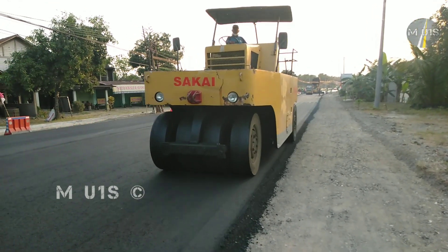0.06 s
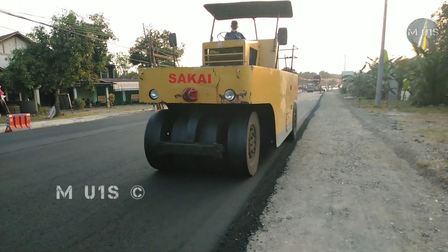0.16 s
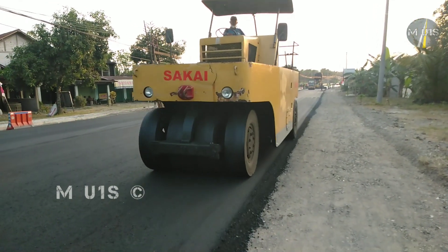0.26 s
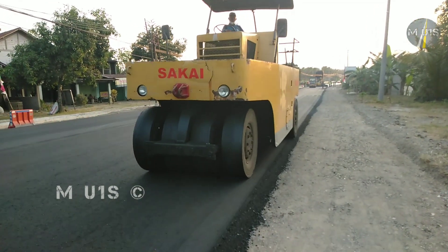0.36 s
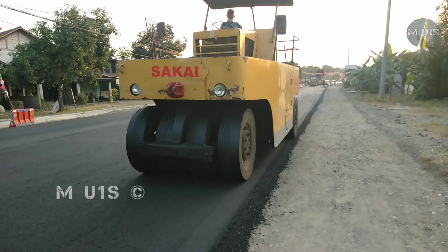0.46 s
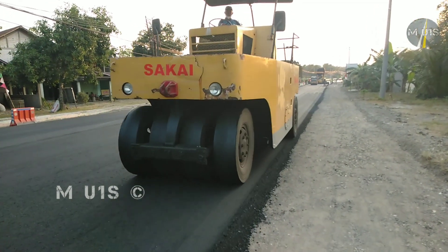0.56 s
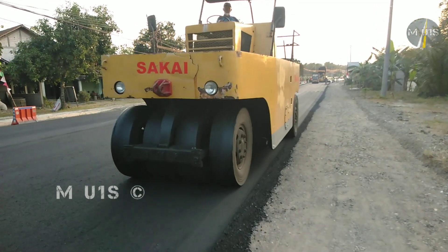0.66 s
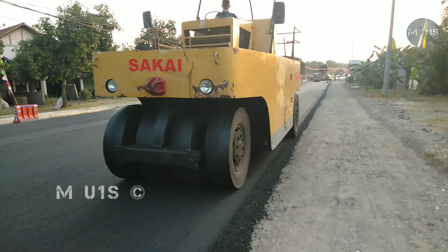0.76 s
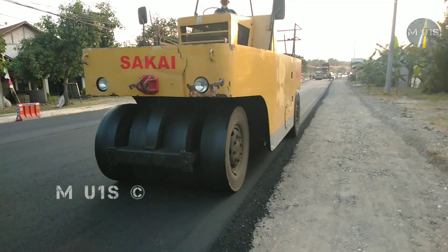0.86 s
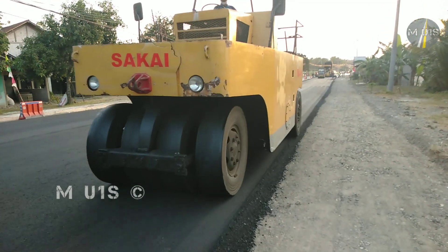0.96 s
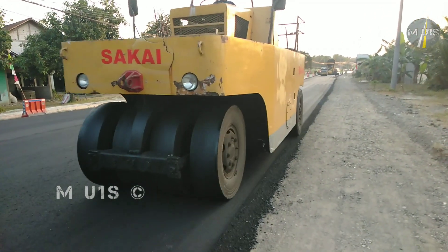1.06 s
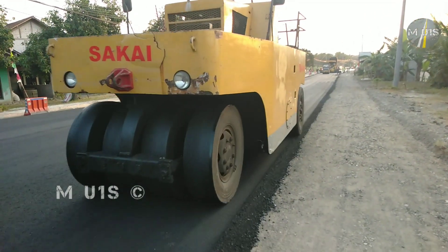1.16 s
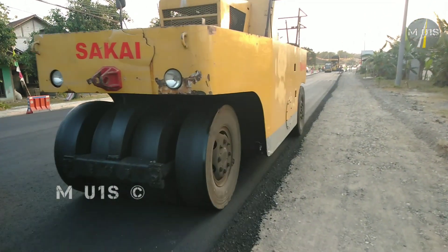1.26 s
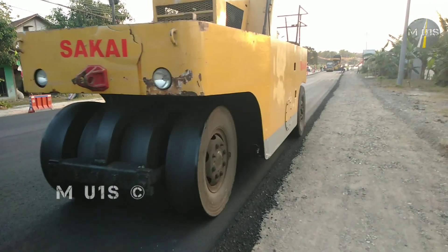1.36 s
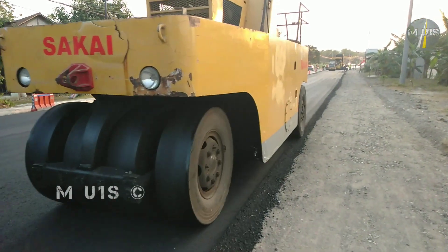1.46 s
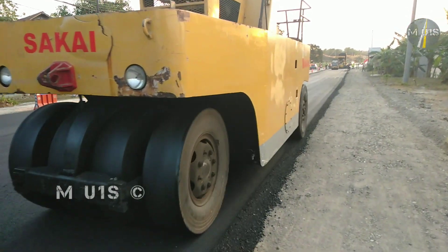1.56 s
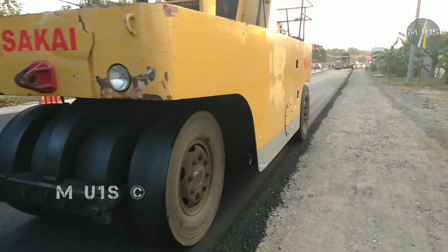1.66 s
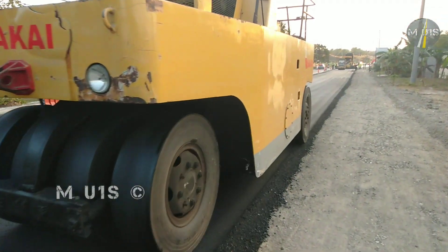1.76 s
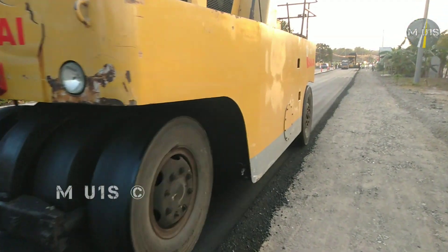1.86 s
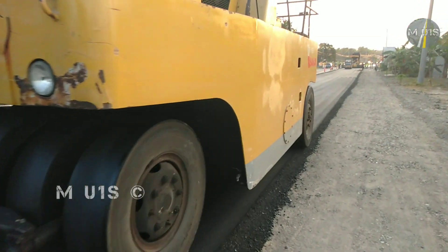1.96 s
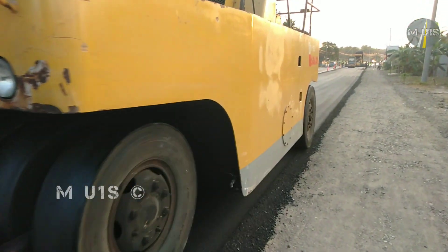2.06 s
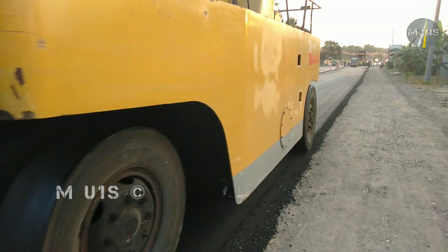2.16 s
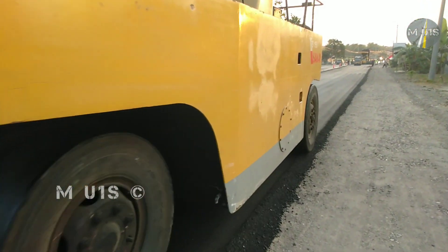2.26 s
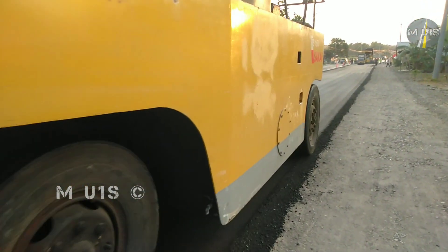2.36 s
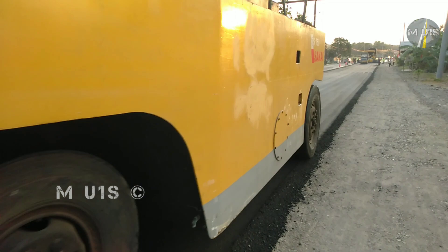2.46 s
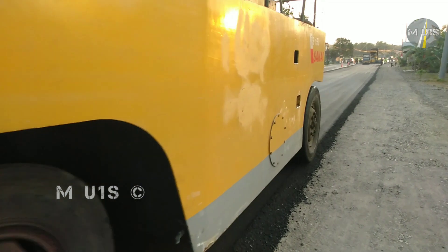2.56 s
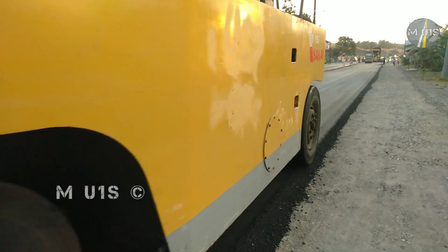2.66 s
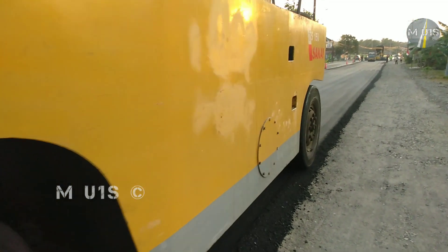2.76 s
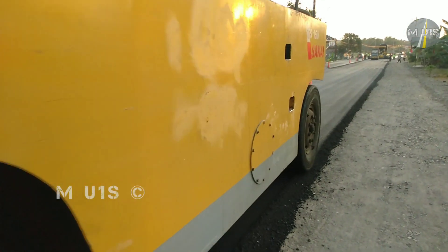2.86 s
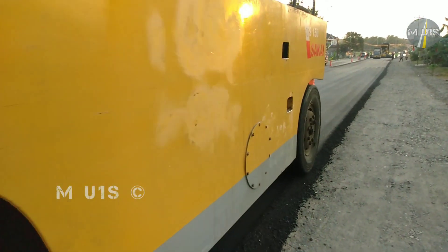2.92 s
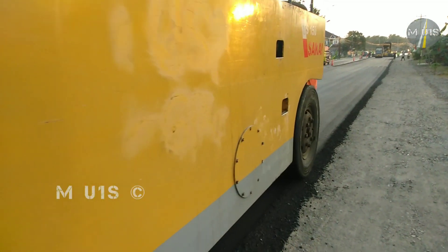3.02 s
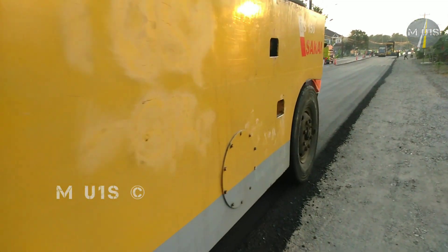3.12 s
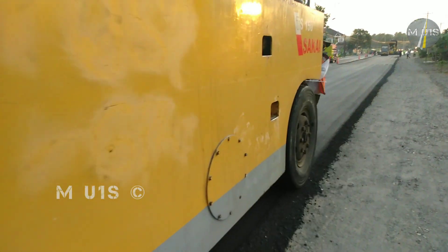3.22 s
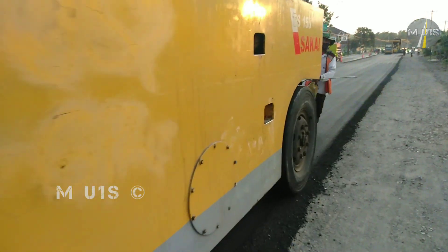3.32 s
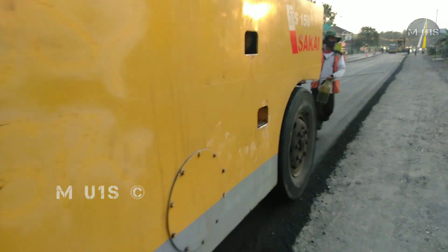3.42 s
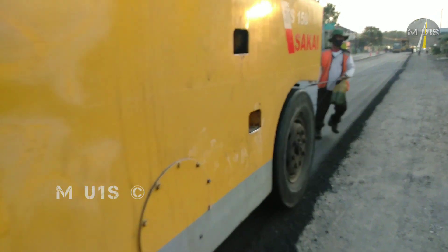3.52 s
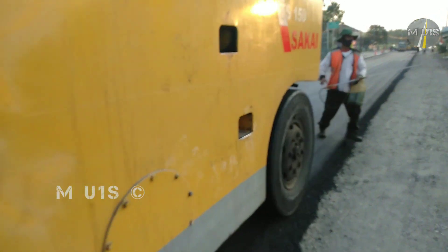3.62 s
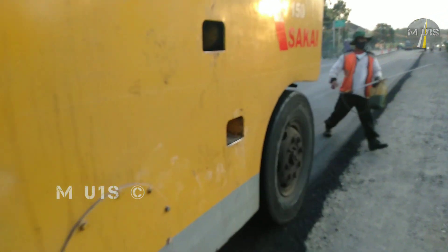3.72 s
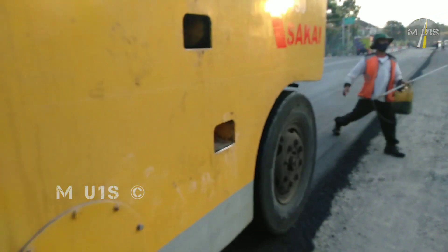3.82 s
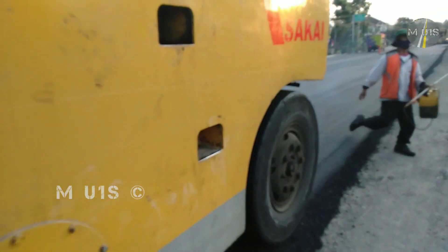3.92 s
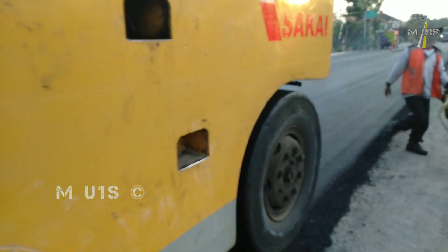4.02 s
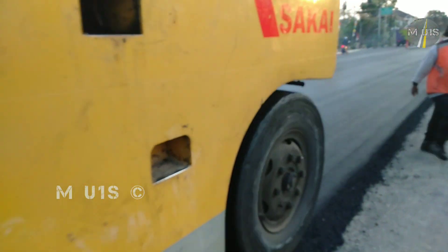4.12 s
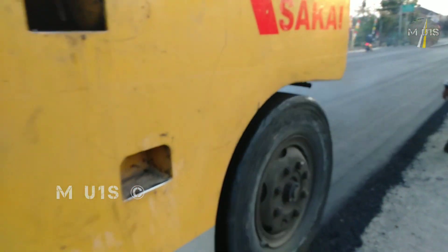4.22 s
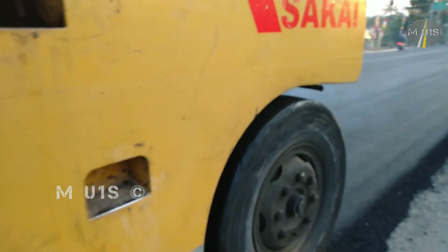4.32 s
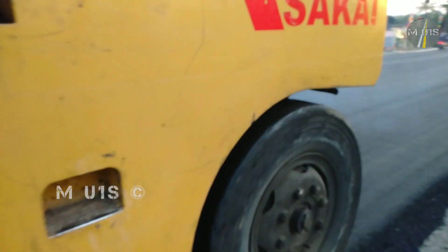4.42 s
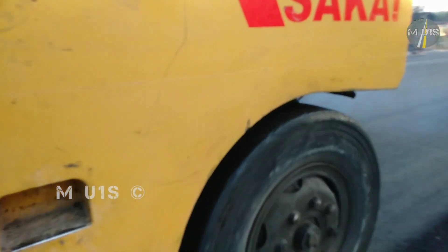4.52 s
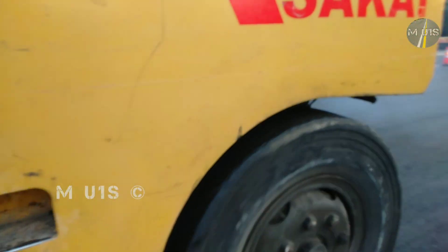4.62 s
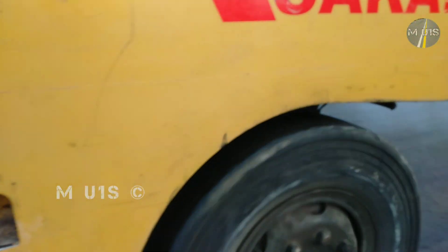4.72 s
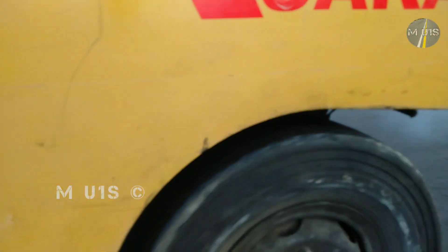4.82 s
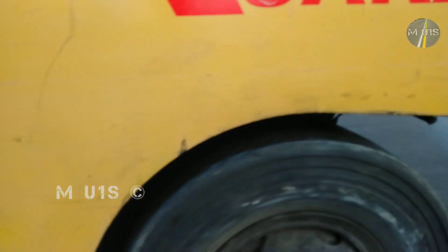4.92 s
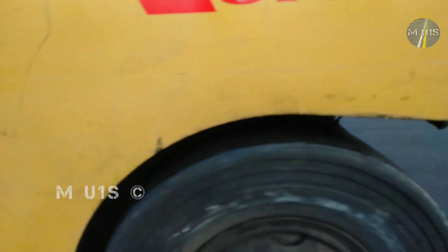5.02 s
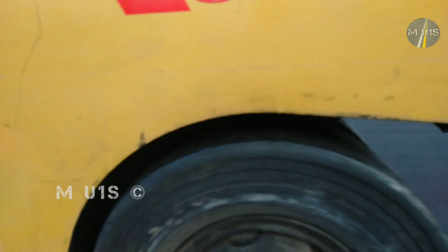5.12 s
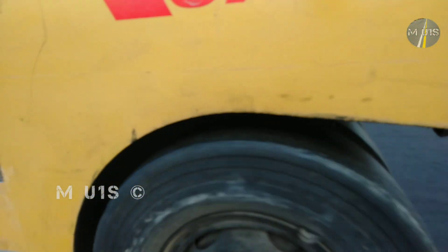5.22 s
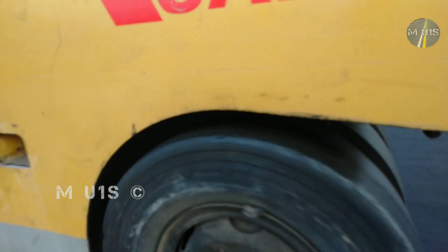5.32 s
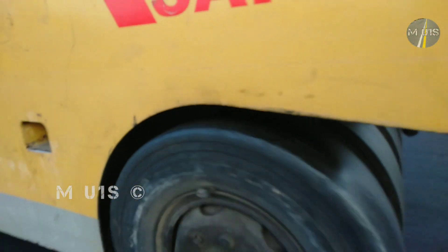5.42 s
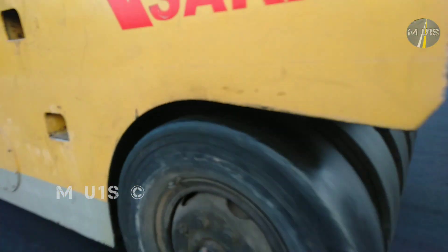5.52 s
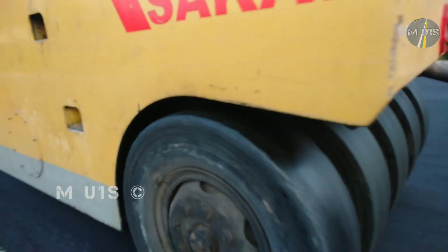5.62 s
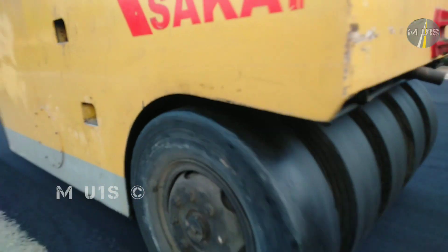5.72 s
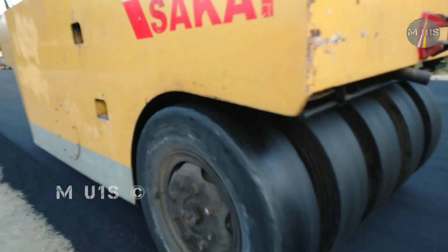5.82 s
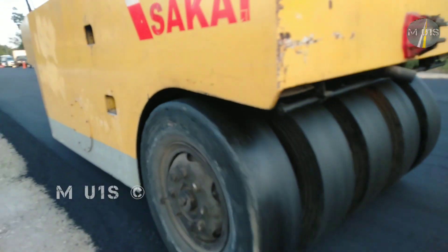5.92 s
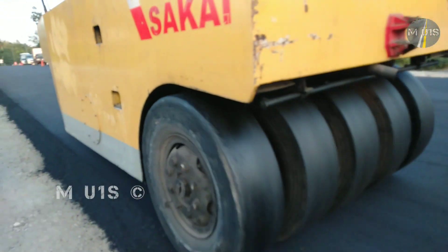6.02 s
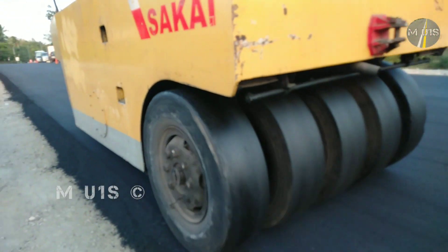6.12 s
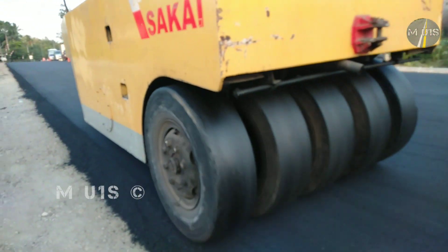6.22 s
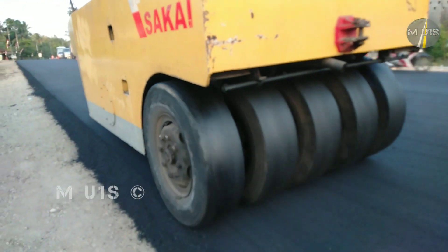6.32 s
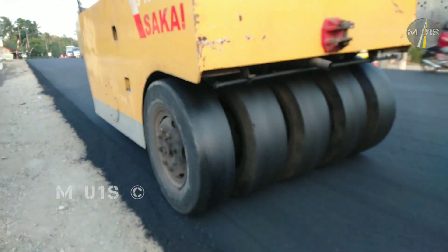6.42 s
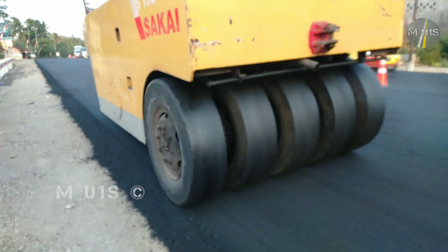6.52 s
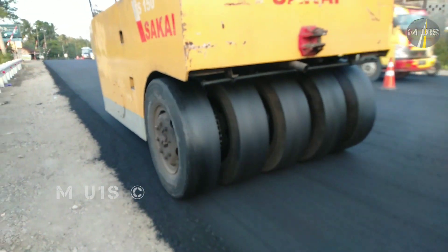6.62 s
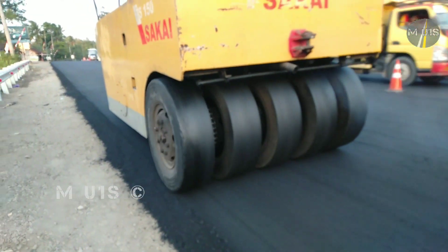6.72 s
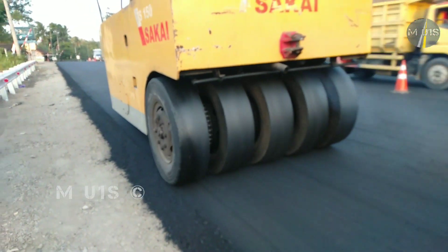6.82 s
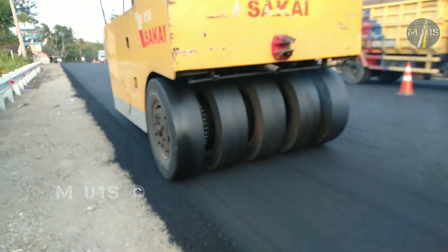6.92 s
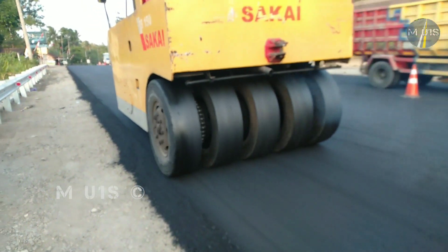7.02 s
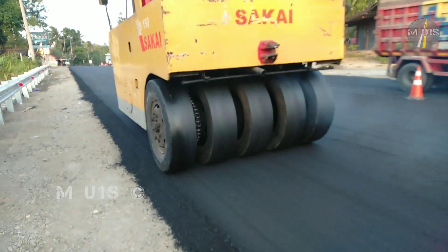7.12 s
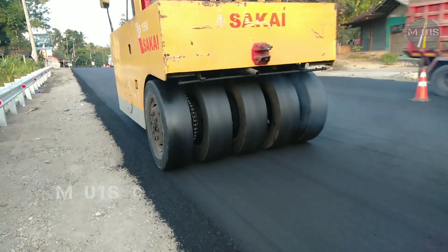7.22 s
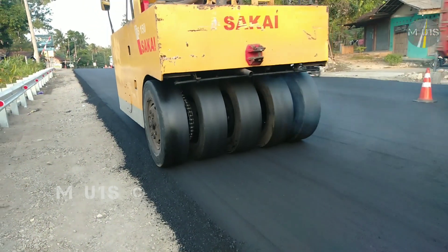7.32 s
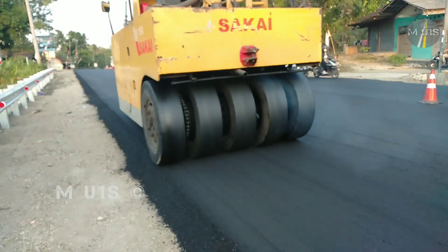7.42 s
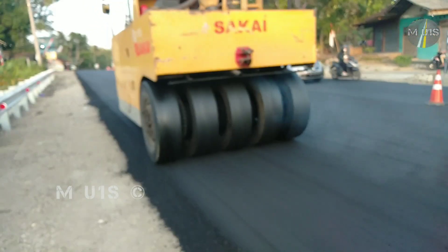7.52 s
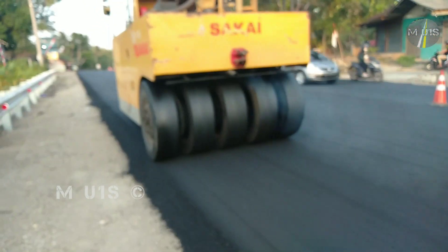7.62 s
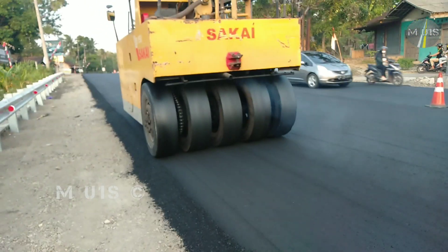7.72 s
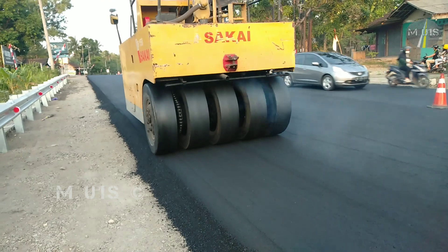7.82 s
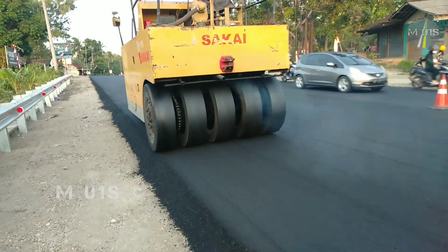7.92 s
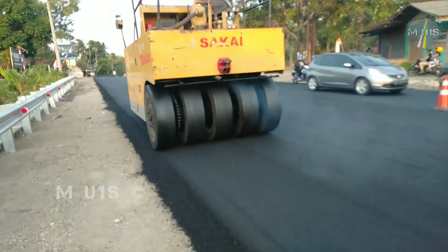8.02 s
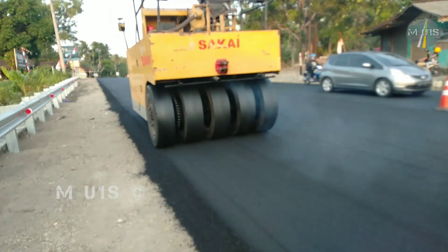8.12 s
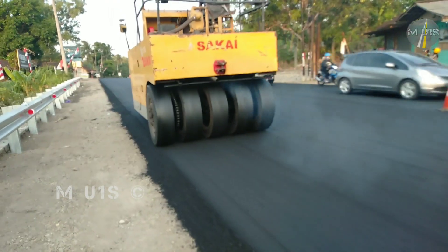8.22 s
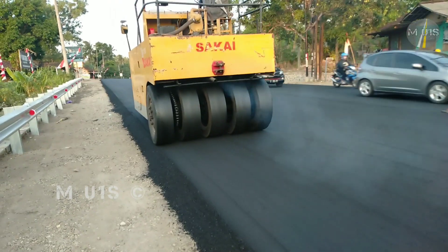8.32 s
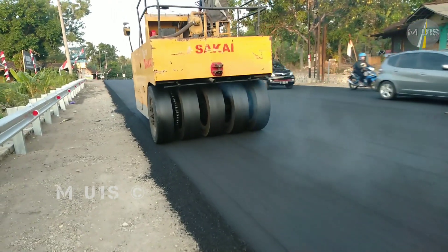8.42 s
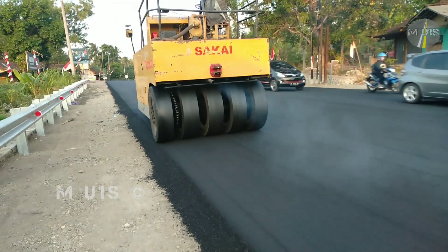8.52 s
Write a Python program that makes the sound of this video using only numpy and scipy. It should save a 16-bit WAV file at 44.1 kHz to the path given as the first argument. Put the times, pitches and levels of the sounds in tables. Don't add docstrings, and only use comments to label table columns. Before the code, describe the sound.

Close pass of a heavy diesel roller: steady throaty drone, fan roar, rattling valves, wavering pump whine, a short air hiss and tiny rubber squeaks.

```python
import sys
import numpy as np
from scipy import signal
from scipy.fft import next_fast_len
from scipy.io import wavfile

SR = 44100
rng = np.random.default_rng(int(sys.argv[2]) if len(sys.argv) > 2 else 0)


def master_out(mix):
    frames = np.transpose(np.atleast_2d(mix))
    ceiling = np.clip(frames, -1, 1)
    pcm = np.round(ceiling * 32767).astype(np.int16)
    wavfile.write(sys.argv[1], SR, pcm)


def convert_level_to_amplitude(level_db):
    exponent = np.asarray(level_db, float) / 20
    return 10 ** exponent


N = 377937


def rms_one(x):
    return x / np.sqrt(np.mean(x ** 2) + 1e-20)


def in_time(rows):
    s, *columns = np.transpose(rows)
    return [np.interp(np.arange(N) / SR, s, c) for c in columns]


def drift(rate):
    hop = 40
    r = np.exp(-2 * np.pi * rate * hop / SR)
    noise = rng.standard_normal(N // hop + 2002)
    slow = signal.lfilter([1], [1, -2 * r, r * r], noise)[2000:]
    return np.interp(np.arange(N) / hop, np.arange(len(slow)), rms_one(slow))


def resonance(x, hz, width_hz):
    r = np.exp(-np.pi * width_hz / SR)
    zeros = [(1 - r * r) / 2, 0, (r * r - 1) / 2]
    poles = [1, -2 * r * np.cos(2 * np.pi * hz / SR), r * r]
    return signal.lfilter(zeros, poles, signal.lfilter(zeros, poles, x))


def tone(cycle, multiple, db, wander):
    return np.sqrt(2) * convert_level_to_amplitude(db) * np.cos(2 * np.pi * multiple * cycle + wander)


def beams(rows, between_db):
    t = np.arange(N) / SR
    bells = sum(convert_level_to_amplitude(db) * np.exp(-((t - s) / half) ** 2) for s, half, db in rows)
    return 20 * np.log10(convert_level_to_amplitude(between_db) + bells)


# time in seconds, speed in rpm.
SPEED = [(0.0, 1046.7), (0.75, 1041.2), (1.5, 1047.9), (2.25, 1037.7), (3.0, 1037.1), (3.75, 1035.3),
         (4.5, 1025.0), (5.25, 1022.0), (6.0, 1024.6), (6.75, 1027.6), (7.5, 1022.9), (8.57, 1031.5)]


def engine_cycle():
    rpm, = in_time(SPEED)
    return np.cumsum(rpm) / 120 / SR


ROAR_CENTRES_HZ = [75, 180, 400, 690, 1200, 2700, 5300, 8400]
# closest moment in seconds, reach in seconds.
PARTS = [
    (2.2, 1.62),
    (3.45, 1.6),
    (4.95, .8),
    (7.199, 2),
]
# one part's levels in dB at its closest, one for each roar centre.
PARTS_DB = [
    [-43, -60, -40, -38.5, -37.5, -42.5, -64.5, -72.5],
    [-40, -26.5, -42.5, -36.5, -37, -45, -68, -59],
    [-41, -43, -39, -44, -33.5, -48, -63, -64.5],
    [-40, -40, -38, -39.5, -39, -49.5, -68, -67.5],
]


def passing_levels():
    t = np.arange(0, N, 64) / SR
    spreading, shadow = 1, 0.71
    law = spreading + shadow * np.linspace(0, 1, 8)[:, None]
    power = 0
    for (closest, reach), db in zip(PARTS, PARTS_DB):
        distance_squared = 1 + ((t - closest) / reach) ** 2
        power = power + convert_level_to_amplitude(2 * np.array(db))[:, None] * distance_squared ** -law
    return np.array([np.interp(np.arange(N) / SR, t, 10 * np.log10(p)) for p in power])


# frequency in Hz, level in dB
# per Hz.
COLOUR = [(30, -18.5), (44, -4.5), (60, -7), (180, -7.5), (280, -7), (450, -8.5), (800, -10.5), (1050, -13),
          (1400, -18), (1950, -22.5), (2300, -28.5), (3000, -27.5), (3700, -34.5),
          (4400, -34.5), (5600, -34.5), (6400, -29), (6900, -33.5), (7550, -23.5), (9000, -27.5),
               (10500, -40), (12000, -45)]


def roar(cycle, levels):
    changes = levels - levels.mean(axis=1, keepdims=True)
    colour_hz, colour_level = np.array(COLOUR).T
    firing = np.cos(2 * np.pi * (6 * cycle - 1 / 4))
    edges = 27 * 2 ** np.arange(0, 9.1, 1 / 4)
    white = rng.standard_normal((2, N))
    together = drift(12)
    out = np.zeros(N)
    for k, (low, high) in enumerate(zip(edges, edges[1:])):
        log_hz = np.log(low * high) / 2
        place = np.interp(log_hz, np.log(ROAR_CENTRES_HZ), np.arange(8))
        first = min(int(place), len(levels) - 2)
        change_db = changes[first] + (place - first) * (changes[first + 1] - changes[first])
        colour_db = np.interp(log_hz, np.log(colour_hz), colour_level)
        pulse_db = np.clip(0.08 * (place - 3), 0, 1) * together + 0.75 * drift(9.6)
        pulse_db = pulse_db + np.clip(place - 4.5, 0, 2) * 0.7 * firing
        band_pass = signal.butter(2, [low, high], "band", fs=SR, output="sos")
        out += convert_level_to_amplitude(colour_db + change_db + pulse_db) * signal.sosfilt(band_pass, white[k % 2])
    return convert_level_to_amplitude(-29.5) * rms_one(out)


# time in seconds, extra path in metres, strength in dB.
ROAD = [(0, .57, -7), (2.3, .59, -9), (3.2, .6, -17), (5.2, .58, -15), (5.9, .53, -9), (6.6, .49, -6),
        (7.7, .44, -6), (8.57, .41, -9)]


def road_echo(x):
    path_m, strength_db = in_time(ROAD)
    sound_m_s = 343
    turned = np.real(signal.hilbert(x, next_fast_len(N))[:N] * np.exp(1j * np.pi / 2))
    dull = signal.lfilter(*signal.butter(1, 1500, fs=SR), turned)
    late = np.interp(np.arange(N) - path_m / sound_m_s * SR, np.arange(N), dull)
    return x + convert_level_to_amplitude(strength_db) * late


# middle in seconds, half length in seconds, level in dB.
EXHAUST = [
    [(.9, 0.58, -47.5), (4.1, 1.5, -32.5), (5.9, 0.55, -41.5), (6.9, .25, -40.5), (8.2, 0.36, -38)],
    [(.1, 0.55, -30), (1.7, 1.1, -29), (3.0, .35, -37), (4.35, 0.76, -32.5), (6.4, 0.66, -36),
     (7.6, 1.1, -35.5)],
    [(3.05, .5, -31), (3.95, .6, -31), (8.5, 0.22, -39.5)],
    [(3.1, 1, -38.5), (4.4, 0.3, -34.5), (5.0, 0.43, -38), (6.0, 0.16, -44)],
]
EXHAUST_BETWEEN_DB = [-45, -48.5, -47, -53.5]
# multiple of the four-stroke cycle, level in dB.
UNEVEN = [(7, -45.5), (8, -50.5), (10, -45.5), (11, -57), (14, -49), (16, -50.5), (20, -43.5), (23, -45),
          (30, -54)]


def exhaust(cycle, near_db):
    even = 0
    for k, (rows, between_db) in enumerate(zip(EXHAUST, EXHAUST_BETWEEN_DB), 1):
        even = even + tone(cycle, 6 * k, beams(rows, between_db) + drift(6), drift(3) / 5)
    uneven = 0
    for multiple, db in UNEVEN:
        flutter_db = db + 0.5 * near_db + 0.41 * drift(1.1)
        uneven = uneven + tone(cycle, multiple, flutter_db, 1.5 * drift(0.88))
    return uneven - even


# middle in seconds, half length in seconds, level in dB.
PUMP = [
    [(.1, .6, -44.5), (1.25, .8, -41.5), (2.9, .25, -40), (4.0, .2, -40), (5.4, .75, -41), (7.3, .2, -42)],
    [(.7, 1.2, -42), (2.25, .2, -39), (3.15, .3, -39), (3.85, .3, -40), (4.85, .35, -43), (6.7, .35, -46)],
]
# middle in seconds, half length in seconds, level in dB.
CASING = [(.9, 0.65, -44.5), (2.13, .25, -37), (2.8, .17, -32), (3.15, 0.15, -41), (3.55, 0.081, -38),
          (3.78, 0.057, -33.5), (4.26, 0.18, -30), (4.58, 0.12, -30.5), (4.97, 0.23, -33),
          (5.34, 0.069, -33), (5.7, 0.66, -37.5), (6.25, 0.17, -40.5)]


def pump(cycle):
    tooth_rate = 32
    teeth_db, octave_db = (beams(rows, -69) + 0.5 * drift(1.8) for rows in PUMP)
    waver = 0.6 * drift(2)
    teeth = tone(cycle, tooth_rate, teeth_db + 1.5, waver)
    teeth = teeth + tone(cycle, 2 * tooth_rate, octave_db + 1.5, 2 * waver)
    casing_db = beams(CASING, -47.5) + 0.5 * drift(9.3)
    ringing = rms_one(resonance(rng.standard_normal(N), 828, 39))
    third = tone(cycle, 3 * tooth_rate, -4, 4 * waver)
    return teeth + convert_level_to_amplitude(casing_db - 3) * (0.76 * ringing + third)


def burst(strikes, cover, t60):
    envelope = signal.lfilter([1], [1, -convert_level_to_amplitude(-60 / (t60 * SR))], strikes)
    envelope = signal.lfilter([0.01], [1, -0.99], envelope)
    rattle = envelope * rng.standard_normal(N)
    out = 0
    for k, (hz, width_hz, db) in enumerate(cover):
        out = out + (-1) ** k * convert_level_to_amplitude(db) * resonance(rattle, hz, width_hz)
    return rms_one(out)


def valve(cycle, at_share, db, cover, t60, spread_db):
    count = np.floor(cycle - at_share + 1).astype(int)
    strength = convert_level_to_amplitude(spread_db * rng.standard_normal(99))
    strikes = np.diff(count, prepend=count[0]) * strength[count]
    return convert_level_to_amplitude(db) * burst(strikes, cover, t60)


# time in seconds, bright valve level in dB, dull valve level in dB.
CLACK = [(0, -54, -49), (1, -55, -44.5), (2, -47.5, -47), (3, -47.5, -42.5), (4, -49, -46),
         (5, -48.5, -50.5), (6, -55.5, -46), (7, -54, -59), (8.57, -61, -50)]
# frequency in Hz, width in Hz, level in dB.
BRIGHT_COVER = [(1920, 510, 9.5), (2950, 1100, 4.5), (3440, 2700, 0)]
# frequency in Hz, width in Hz, level in dB.
DULL_COVER = [(1060, 380, 1), (1467, 320, -3.5), (2054, 380, -8.5), (2690, 2400, -15.5)]
# frequency in Hz, width in Hz, level in dB.
LOUVRES = [(4520, 900, -14), (5640, 900, 9.5), (7840, 1200, 0)]


def valve_clacks(cycle, louvre_db):
    bright_db, dull_db = in_time(CLACK)
    bright = valve(cycle, 0.29, bright_db, BRIGHT_COVER, t60=0.11, spread_db=1.2)
    direct = valve(cycle, 0.24, louvre_db + 9.5, LOUVRES, t60=0.16, spread_db=1)
    dull = valve(cycle, 0.77, dull_db, DULL_COVER, t60=0.07, spread_db=0.5)
    return bright + direct + dull


# middle in seconds, half length in seconds, level in dB.
TICKING = [(3.1, 1, -40), (4.85, .75, -41), (6.1, 0.35, -60)]
# frequency in Hz, width in Hz, level in dB.
TICK_COVER = [(5400, 1200, -1), (7770, 1300, 6.5), (9200, 2200, -3), (11000, 2500, -7)]


def valve_ticks(cycle):
    strong = valve(cycle, 0.27, beams(TICKING, -56.5), TICK_COVER, t60=0.14, spread_db=1.5)
    weak = valve(cycle, 0.74, beams(TICKING, -63) - 8, TICK_COVER, t60=0.12, spread_db=1.0)
    return strong + weak


# middle in seconds, half length in seconds, pitch in Hz, width in Hz.
SWELLS = [(1.8, 1.8, 117, 4), (1.2, 1.5, 177, 5), (6.0, .8, 70, 3), (7.2, .5, 70, 3), (7.1, .6, 141, 5),
          (7.6, .9, 189, 4), (5.7, .7, 255, 8), (5.95, .12, 660, 25), (6.9, .15, 690, 30),
          (6.15, .25, 845, 25), (2.05, .15, 842, 15), (.8, 1.6, 1380, 120), (1.2, 1.5, 1960, 110),
          (4.4, 1.1, 1935, 170), (4.8, .2, 692, 15), (8.3, .5, 7650, 200), (4.4, .5, 14600, 1800),
          (3.4, 1.6, 5500, 1200), (7.2, .6, 8100, 1000), (5.1, .7, 7700, 800), (1.8, .5, 8300, 1000),
          (7.8, .9, 9800, 1600), (4.55, .12, 852, 25)]
SWELLS_DB = [-39.5, -41.5, -41.5, -36.5, -36.5, -44, -41, -38, -40, -38, -40, -48.5, -56.5, -50.5, -40.5,
             -50, -63, -45.5, -42.5, -45, -42, -46.5, -39]


def swells():
    t, out = np.arange(N) / SR, np.zeros(N)
    for (middle, half, hz, width_hz), db in zip(SWELLS, SWELLS_DB):
        hum = rms_one(resonance(rng.standard_normal(N), hz, width_hz))
        out += convert_level_to_amplitude(db + 1.85 * drift(22)) * np.exp(-((t - middle) / half) ** 2) * hum
    return out


# start in seconds, end in seconds, level in dB.
LEAK = (2.56, 3.87, -62)


def air_leak():
    start, end, db = LEAK
    t = np.arange(N) / SR
    band_pass = signal.butter(2, [7200, 10200], "band", fs=SR, output="sos")
    jet = rms_one(signal.sosfilt(band_pass, rng.standard_normal(N)))
    gate = np.clip(np.minimum(t - start, end - t) / 0.02, 0, 1)
    return convert_level_to_amplitude(db + 23.5) * jet * gate


# middle in seconds, half length in seconds, level in dB.
SQUEAKS = [(6.03, .014, -53), (6.105, .014, -53), (6.18, .025, -52), (6.22, .2, -56), (6.267, .012, -52),
           (6.335, .014, -55), (6.56, .035, -53)]


def squeaks():
    rubber = resonance(rng.standard_normal(N), hz=2683, width_hz=90)
    return convert_level_to_amplitude(beams(SQUEAKS, -75)) * rms_one(rubber)


def scene():
    cycle = engine_cycle()
    levels = passing_levels()
    block_db, louvre_db = levels[4], levels[6]
    machine = road_echo(roar(cycle, levels))
    machine = machine + exhaust(cycle, block_db - block_db.mean()) + pump(cycle)
    machine = machine + valve_clacks(cycle, louvre_db) + valve_ticks(cycle)
    machine = machine + swells() + air_leak() + squeaks()
    return machine[None]


def low_pass(x):
    return signal.sosfilt(signal.butter(12, 15504, fs=SR, output="sos"), x)


def record(dry):
    x = signal.sosfilt(signal.butter(3, 42, "high", fs=SR, output="sos"), dry)
    shelf = convert_level_to_amplitude(-28) * x
    x = signal.sosfilt(signal.butter(6, 3300, fs=SR, output="sos"), x) + shelf
    x = x + convert_level_to_amplitude(-69.5) * rng.standard_normal(dry.shape)
    return low_pass(x)


dry = scene()
out = record(dry)
master_out(out)
```